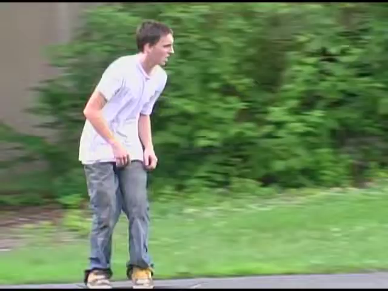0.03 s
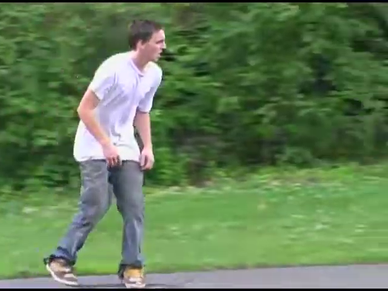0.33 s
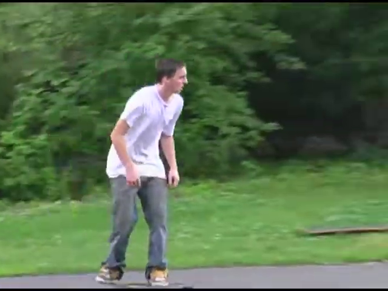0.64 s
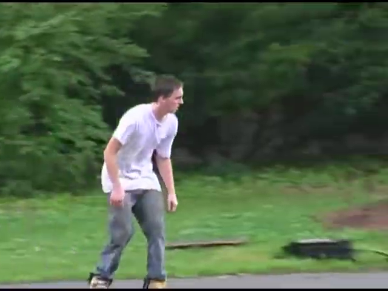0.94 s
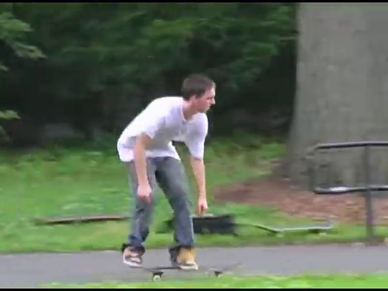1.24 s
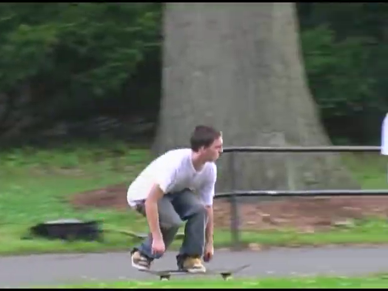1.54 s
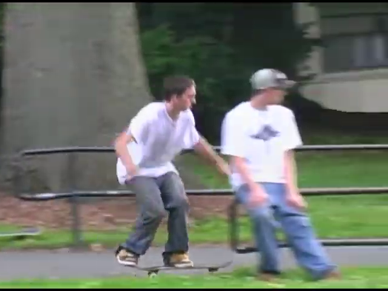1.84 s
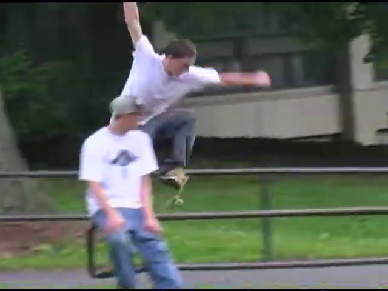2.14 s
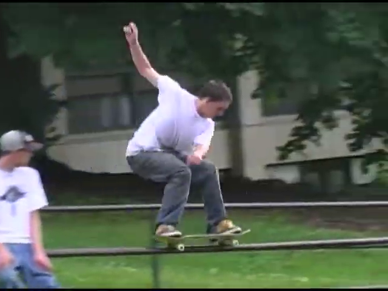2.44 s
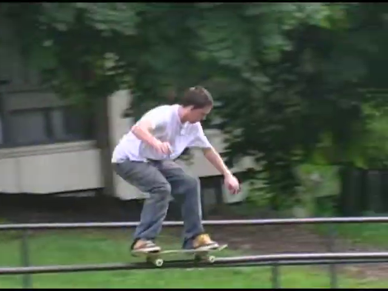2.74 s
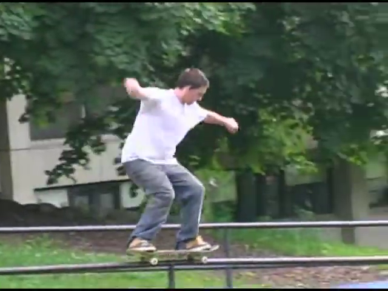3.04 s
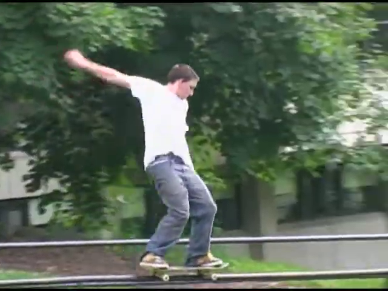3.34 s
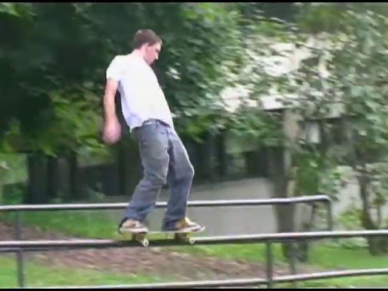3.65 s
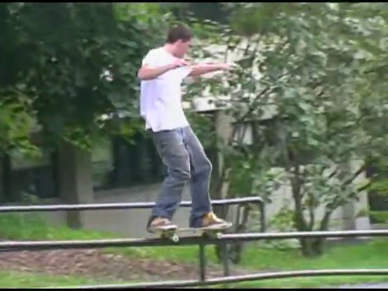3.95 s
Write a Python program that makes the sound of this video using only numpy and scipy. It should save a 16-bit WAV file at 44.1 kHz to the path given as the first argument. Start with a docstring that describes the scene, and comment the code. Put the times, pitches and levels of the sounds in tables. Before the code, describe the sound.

Skateboard wheels roll over gritty pavement past a nearby microphone. After a light clatter, the board hits a metal rail with a loud, ringing crack that echoes outdoors, then scrapes along it, slowly receding.

```python
"""A skateboard passes close by on an asphalt path outdoors, the stereo microphone turning after it.
Its wheels roar and crunch; it clatters as it jumps, lands on a steel rail with one sharp crack
and grinds away along the ringing tube. Farther off, trees and a building throw the crack back
as a bright wash. A low rumble and a distant hum lie under everything.
The small recorder overloads on the crack."""
import sys
import numpy as np
from scipy import signal
from scipy.fft import rfft, irfft
from scipy.io import wavfile

SR = 44100
rng = np.random.default_rng(int(sys.argv[2]) if len(sys.argv) > 2 else 0)


def inscribe(sig):
    """Save sig as 16-bit PCM at rate SR to the path in sys.argv[1].

    A 1-D sig is mono; a 2-D sig holds one channel per row.
    Samples are clipped to [-1, 1] before scaling.
    """
    pcm = np.round(np.clip(np.atleast_2d(sig).T, -1, 1) * 32767)
    wavfile.write(sys.argv[1], SR, pcm.astype(np.int16))


N = 176400
T = np.arange(N) / SR
BIN_HZ = np.arange(N // 2 + 1) * SR / N
START_S, ROLL_START_S, JUMP_S, LAND_S = .0725, .0975, 2.125, 2.4125

# the board's bearing as the microphone turns after it: t/s, left minus right/dB
BEARING = [(.1, 1), (.6, 1.5), (1.0, -2), (1.5, -8), (2.0, -9.5), (2.35, -7.5), (2.7, -4.5), (3.1, 0),
           (3.5, 2.5), (4, 3)]
# wheels on the asphalt path: t/s, roar level/dB, grit level/dB
ROLL = [(.1, -37, -44), (.6, -37.5, -43.5), (1.0, -37.5, -45), (1.35, -38.3, -44), (1.65, -37.5, -45),
        (1.95, -37.5, -44), (2.15, -36, -41.5), (2.4, -37.5, -43)]
# spectra of the dark roar, the crunching grit and a bright hiss: f/Hz, relative level/dB
ROAR = [(80, -21), (200, -4.5), (330, -2.5), (420, -4), (560, -3.5), (850, -2.5), (1100, -3.5),
        (1380, -6.5), (1580, -17.5), (2500, -49), (8000, -60)]
GRIT = [(300, -13), (900, -10), (1600, 4.5), (2300, 4), (3300, -0.5), (5300, -7), (7500, -10.5),
        (9000, -17), (12000, -29.5), (15000, -28)]
HISS = [(600, -14), (1500, -5), (2500, 0.5), (3800, 1.5), (4400, 1.5), (4900, 0.5), (5500, 0.5), (6300, -5),
        (7600, -4.5), (8800, -15.5), (12500, -25.5), (15000, -38)]


def rolling():
    """Wheels roar and crunch on the asphalt, fading out on landing; an early hiss dies off to the left."""
    roar_db, grit_db = in_time(ROLL)
    left_db, = in_time(BEARING)
    roar = from_db(roar_db) * spread(grains(), ROAR, width_db=1.8) * flutter(depth_db=0.68, rate_hz=21)
    grit = from_db(grit_db) * spread(grains(), GRIT, width_db=3.5) * flutter(depth_db=0.5, rate_hz=49)
    bands = deck_resonances() + pass_sweep()
    hiss_db = -40 - 11.5 * np.maximum(T - 0.21, 0)  # holds briefly, then falls 11.5 dB/s
    hiss = from_db(hiss_db) * spread(white(), HISS, width_db=-12)
    centred = deck_thrum() + scuffs()
    moving = pan(roar + bands, left_db) + pan(grit, 0.58 * left_db) + pan(hiss, left_db=11 * T)
    return (centred + moving) * after(ROLL_START_S, 0.00061) * (1 - after(LAND_S, 0.2))


# resonances of the rolling deck and wheels: f/Hz, half-width/Hz, level/dB, fall/(dB/s)
DECK = [(536, 50, -43, 5.5), (660, 75, -38, 15.5), (780, 70, -39.5, 11.5), (1380, 80, -44, 12),
        (2450, 150, -51, 11.5), (3350, 170, -50, 9.5), (4420, 170, -52.5, 7.5), (5360, 170, -56, 6)]


def deck_resonances():
    """Friction noise through narrow resonances, each fading at its own rate."""
    out = 0
    for hz, width_hz, db, fall in DECK:
        band = irfft(rfft(white()) / (1 + ((BIN_HZ - hz) / width_hz) ** 2), N)
        out = out + from_db(db - fall * T) * rms_one(band)
    return np.std(out) * spread(out, width_db=-14)


# hollow band in the roar as the board passes the microphone: t/s, f/Hz, level/dB
PASS_SWEEP = [(1.0, 1199, -65), (1.35, 1117, -44.5), (1.6, 1017, -41.5), (1.87, 867, -42),
              (2.1, 779.5, -41), (2.25, 897, -42), (2.4, 989, -56)]


def pass_sweep():
    """A hollow band, the colour of the ground reflection, sinks as the board nears, then climbs."""
    return gliding(PASS_SWEEP, width_hz=160, width_db=2)


# the deck at close range: f/Hz, relative level/dB
THRUM = [(60, -15), (130, -9), (230, -6), (350, -4.5), (450, -21), (900, -37), (8000, -73)]


def deck_thrum(closest_s=2.01, pass_width_s=0.78):
    """The deck's low thrum, heard while the board passes closest to the microphone."""
    nearness = np.exp(-((T - closest_s) / pass_width_s) ** 2)
    return from_db(-41) * spread(white(), THRUM) * nearness


# scuffs along the path: t/s, level/dB
SCUFFS = [(1.27, -56), (1.368, -50.5)]
# their spectrum: f/Hz, relative level/dB
SCUFF_SPECTRUM = [(800, -20), (2500, -5), (5000, 5), (8000, -5), (12000, -8), (15000, -20)]


def scuffs():
    """The wheels scuff over loose grit in short, bright bursts."""
    bursts = sum(from_db(db) * dying(s, hold_s=0.018, t60=.15) for s, db in SCUFFS)
    return spread(white(), SCUFF_SPECTRUM) * bursts


# the landing, truck after truck, then a light chatter: t/s, relative level/dB, brightness/(dB/octave)
LANDING = [(2.4122, -1.5, 0.7), (2.4138, -3, -0.5), (2.4175, -10.5, -1), (2.4188, -10.5, 1.5),
           (2.4205, -15, -3), (2.4260, -12, 6), (2.4358, -15, -4), (2.4415, -22, 0)]
# lighter knocks at the jump and on the rail: same columns
KNOCKS = [(2.122, -38, -5), (2.138, -20, 1), (2.166, -24, 2), (2.997, -28, 2)]
# modes of deck and trucks: f/Hz, relative level/dB, t60/s
BOARD_MODES = [(624, -21, 0.037), (975, -16, 0.025), (1258, -6.5, 0.031), (1561, -4.5, 0.014),
               (1890, -10, 0.033), (2700, 1.5, 0.0065), (3400, 1, 0.0072), (4220, -0.5, 0.014),
               (4953, -5, 0.015), (5730, -12, 0.012), (6930, -11, 0.011), (10530, -21, 0.013)]


def board_impacts(blows, contact_s=.0012, bend_lag_s=0.0021):
    """Each blow snaps and rings the deck; the low modes arrive a little later than the high ones."""
    s, db, brightness = np.transpose(blows)
    modes = np.zeros((2, N))
    for hz, mode_db, t60 in BOARD_MODES:
        chance = rng.standard_normal((len(s), 3))
        scatter_db, polarity = 1.4 * chance[:, :2].T, np.sign(chance[:, 2])
        tilt_db = brightness * np.log2(hz / 3000)
        arrival = ((s + bend_lag_s * (1000 / hz)) * SR).astype(int)  # bending wave, lag given at 1 kHz
        clicks = np.zeros((2, N))
        clicks[:, arrival] = from_db(db + mode_db + tilt_db + scatter_db) * polarity
        modes += ring(clicks, hz, t60)
    contact = sum(from_db(level) * (T >= t) * np.exp(-np.abs(T - t) / contact_s) for t, level, _ in blows)
    snap = from_db(-32) * contact * spread(white())
    return from_db(-13) * modes + snap


# trucks sliding away along the rail: t/s, growl level/dB, scrape level/dB
GRIND = [(2.45, -36.5, -45), (2.75, -36.5, -44), (2.88, -40.5, -45.5), (3.05, -39.5, -44.5),
         (3.3, -40, -46), (3.6, -41.5, -47.5), (3.75, -44, -49), (4, -44, -50.5)]
# spectra of the growl, the scrape and the bump: f/Hz, relative level/dB
GROWL = [(100, -28), (250, -6), (400, -5), (520, 0.3), (740, 0), (900, -2), (1200, -1.5), (1400, -2),
         (1580, -19), (2500, -37), (8000, -60)]
SCRAPE = [(300, -27), (900, -4), (1600, 3.5), (2400, 2.5), (3300, 0.5), (4700, -0.5), (6200, -4.5),
          (7600, -5), (9000, -12.5), (12500, -17.5), (15000, -32)]
BUMP = [(200, -11), (400, -16), (490, 1), (590, -16), (720, 2), (900, -22), (3000, -33), (10000, -44)]
# the hollow band in the grind climbs to about 1200 Hz as the board moves away: t/s, f/Hz, level/dB
GRIND_SWEEP = [(2.45, 1037, -50), (2.64, 1110, -41.5), (2.8, 1232, -40), (2.9, 1200, -47),
               (3.0, 1200, -39.5), (3.12, 1170, -41.5), (3.3, 1207, -46), (3.55, 1206, -50.5),
               (4, 1263, -52.5)]


def grinding():
    """Trucks growl and scrape along the rail and bump once over a post."""
    growl_db, scrape_db = in_time(GRIND)
    left_db, = in_time(BEARING)
    growl = from_db(growl_db) * spread(grains(), GROWL, width_db=-13) * flutter(-0.3, rate_hz=48)
    scrape = from_db(scrape_db) * spread(grains(), SCRAPE, width_db=-7.5) * flutter(-0.2, rate_hz=30)
    sweep = gliding(GRIND_SWEEP, width_hz=92, width_db=-19) * flutter(2.6, rate_hz=51)
    bump = from_db(-29.5) * spread(white(), BUMP, width_db=-5) * dying(2.978, hold_s=0, t60=0.21)
    trucks = pan(growl + sweep + bump, left_db) + pan(scrape, 1.3 + 0.5 * left_db)
    return trucks * after(LAND_S, 0.056)


# modes of the steel rail: f/Hz, level/dB, t60/s
RAIL_MODES = [(1390, -37, 0.65), (2950, -47, 0.83), (3630, -39, .6), (4100, -38, 0.49), (4150, -34, 0.57),
              (4180, -36, .68), (4616, -33, .6), (4770, -34, 0.73), (4987, -42, .6), (5260, -41, 0.77),
              (5370, -50, .6), (5440, -32, 0.67), (6350, -43, 0.53), (6550, -39, .62), (7030, -49, .5)]


def rail_ring(split_hz=18.4):
    """The steel tube rings on after the landing, each mode three close partials that beat."""
    age, out = np.maximum(T - LAND_S, 0), np.zeros((2, N))
    for hz, db, t60 in RAIL_MODES:
        partials = hz + split_hz * (np.array([-1, 0, 1]) + rng.uniform(-0.51, 0.53, 3))
        waves = np.sin(2 * np.pi * (partials[:, None] * age + rng.random((3, 1))))
        stereo = rng.uniform(0.31, 1, (2, 3)) @ waves / np.sqrt(2)
        out += from_db(db) * dying(LAND_S, 0, t60) * stereo
    return out


# echo from the trees and the building: f/Hz, relative level/dB
WASH = [(400, -11.5), (1100, -9), (1600, -2.5), (2400, -8.5), (3500, -1.5), (4600, 2.5), (5600, -2),
        (7200, -7), (8700, -16.5), (10000, -12.5), (13000, -25), (15000, -33)]
# its decay, band by band: f/Hz, t60/s
WASH_T60 = [(500, 1), (2000, 1), (4500, 0.85), (7000, 0.64), (12000, 0.57)]


def echo_wash():
    """Leaves and walls scatter the jump and the landing back to the microphone; the treble dies first."""
    spectrum = rfft(spread(white(), WASH, width_db=0.5) * flutter(depth_db=0.5, rate_hz=60))
    out = 0
    for centre, t60 in WASH_T60:
        band_gain = across_bins([(hz, float(hz == centre)) for hz, _ in WASH_T60])
        landing = from_db(-29) * dying(LAND_S, 0.092, t60)
        jump = from_db(-46) * dying(JUMP_S, 0.038, t60)
        out = out + irfft(spectrum * band_gain, N) * (landing + jump)
    return out


# outdoor rumble: f/Hz, relative level/dB
RUMBLE = [(20, -30), (30, -28), (40, -12.5), (56, -5.5), (68, -15), (82, -2.5), (100, -3), (125, 3),
          (165, -0.5), (230, -1), (300, -9), (400, -17), (800, -16.5), (5000, -40)]
# its slow swells: t/s, level/dB
RUMBLE_LEVEL = [(.1, -34), (.6, -39), (.8, -40.3), (1.3, -40), (1.6, -39.5), (2.4, -38), (3.05, -36.5),
                (3.3, -39.2), (4, -40.5)]
# distant hum: harmonic number, level/dB
HUM = [(1, -60), (2, -52), (3, -51)]


def rumble(hum_hz=42.88, wander_hz=1.818):
    """Low outdoor rumble and a wavering distant hum, nearly the same in both channels."""
    level_db, = in_time(RUMBLE_LEVEL)
    phase = 2 * np.pi * np.cumsum(hum_hz + wander_hz * drift(rate_hz=4)) / SR
    hum = sum(from_db(db) * np.sqrt(2) * np.sin(k * phase) * flutter(3.5, rate_hz=4.4) for k, db in HUM)
    noise = from_db(level_db) * spread(white(), RUMBLE, width_db=0.5)
    return (noise + hum) * after(START_S, 0.00034)


# stereo width at the microphone: f/Hz, side minus mid/dB
WIDTH = [(60, -38), (125, -34), (250, -20), (500, -13), (1000, -7.5), (2000, -4.5), (4000, -9), (8000, -7),
         (12000, -8)]


def spread(pair, spectrum=None, width_db=0):
    """Colour two unrelated signals and mix them into left and right; rms 1."""
    mid, side = rfft(pair) * (from_db(across_bins(spectrum)) if spectrum else 1)
    side_gain = from_db(width_db + across_bins(WIDTH))
    return rms_one(irfft(mid + side_gain * side * [[1], [-1]], N))


# off axis, the two microphone ports differ in phase: f/Hz, quadrature level/dB for a 1 dB lean
PORT_PHASE = [(150, -50), (600, -34), (1200, -34), (1800, -27), (2600, -40), (5000, -57)]


def pan(x, left_db):
    """Lean a sound to one side; the bass stays in the middle and the midrange shifts in phase."""
    spectrum, sides = rfft(x), np.array([[1], [-1]])
    bass = irfft(spectrum / (1 + (BIN_HZ / 480) ** 4), N)
    quadrature = irfft(-1j * spectrum.mean(axis=0) * from_db(across_bins(PORT_PHASE)), N)
    gains = from_db(sides * left_db / 2)
    return bass + (x - bass) * gains / gains.mean(axis=0) + sides * left_db * quadrature


def grains(per_s=2500, spread_db=3, power_share=0.26):
    """Dense tiny impacts of uneven size over smooth noise."""
    size = from_db(spread_db * np.minimum(rng.exponential(1, N), 5))
    clicks = white() * size * (rng.random(N) < per_s / SR)
    return np.sqrt(power_share) * rms_one(clicks) + np.sqrt(1 - power_share) * white()


def gliding(curve, width_hz, width_db):
    """A narrow band of noise whose centre and level follow a curve."""
    hz, db = in_time(curve)
    phase = 2 * np.pi * np.cumsum(hz) / SR
    in_phase, quadrature = irfft(rfft([white(), white()]) / (1 + (BIN_HZ / width_hz) ** 2), N)
    band = in_phase * np.cos(phase) + quadrature * np.sin(phase)
    return from_db(db) * spread(band, width_db=width_db)


def ring(x, hz, t60):
    """A unit click sets a sine of height 1 ringing."""
    r, w = from_db(-60 / (t60 * SR)), 2 * np.pi * hz / SR
    return signal.lfilter([0, np.sin(w)], [1, -2 * r * np.cos(w), r * r], x + 1e-18)


def flutter(depth_db, rate_hz):
    """A randomly wavering gain, as from uneven contact pressure."""
    return from_db(depth_db * drift(rate_hz))


def drift(rate_hz):
    """Smooth random wander of rms 1."""
    hop, settle = 40, 2000
    r = np.exp(-2 * np.pi * rate_hz * hop / SR)
    noise = rng.standard_normal(N // hop + settle + 2)
    slow = signal.lfilter([1], [1, -2 * r, r * r], noise)[settle:]
    return np.interp(np.arange(N) / hop, np.arange(len(slow)), rms_one(slow))


def dying(s, hold_s, t60):
    """Starts at time s, holds, then dies away."""
    return after(s, .003) * from_db(-60 * np.maximum(T - s - hold_s, 0) / t60)


def after(s, rise_s):
    """Opens from 0 to 1 at time s."""
    return np.clip((T - s) / rise_s, 0, 1)


def in_time(rows):
    """Each column of a curve at every sample."""
    s, *columns = np.transpose(rows)
    return [np.interp(T, s, column) for column in columns]


def across_bins(points):
    """A spectrum at every frequency bin, interpolated on a log axis."""
    hz, values = np.transpose(points)
    return np.interp(np.log(np.maximum(BIN_HZ, 1)), np.log(hz), values)


def white():
    """Two unrelated noises."""
    return rng.standard_normal((2, N))


def rms_one(x):
    """Scale to unit rms."""
    return x / np.sqrt(np.mean(x ** 2) + 1e-20)


def from_db(db):
    """Decibels to gain."""
    return 10 ** (np.asarray(db) / 20)


def scene():
    """From beside the path: roll, jump, landing and grind over the rumble."""
    crack = board_impacts(LANDING)
    ring_and_echo = pan(rail_ring() + echo_wash(), left_db=0.3)
    wheels = rolling()
    knocks = pan(board_impacts(KNOCKS), left_db=-5)
    return wheels + knocks + crack + ring_and_echo + grinding() + rumble()


def record(dry, mic_top_hz=13800, input_bias=0.033, overload=.265, cutoff_hz=15800):
    """The microphone dulls the top; the input adds a faint whine and a bias, and clips on the crack."""
    heard = signal.sosfilt(signal.butter(6, mic_top_hz, fs=SR, output="sos"), dry)
    whine = from_db(-76) * np.sqrt(2) * np.sin(2 * np.pi * 15736 * T)
    biased = heard + (whine + input_bias) * after(START_S, 0.0019)
    clipped = biased / (1 + (biased / overload) ** 6) ** (1 / 6)
    return signal.sosfilt(signal.ellip(10, .1, 70, cutoff_hz, fs=SR, output="sos"), clipped)


dry = scene()
out = record(dry)
inscribe(out)
```